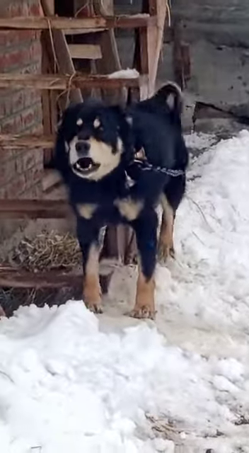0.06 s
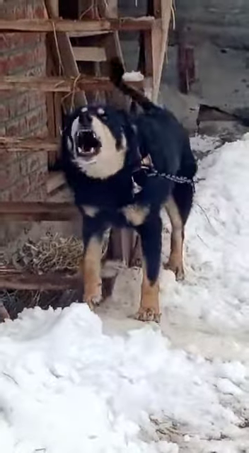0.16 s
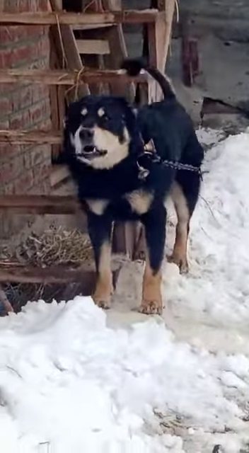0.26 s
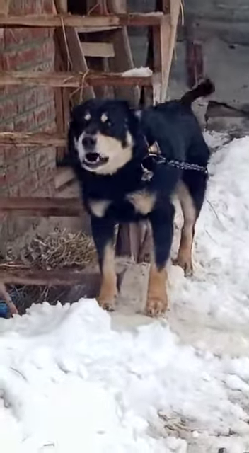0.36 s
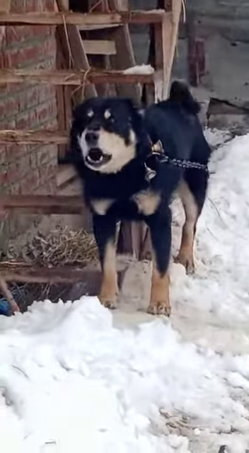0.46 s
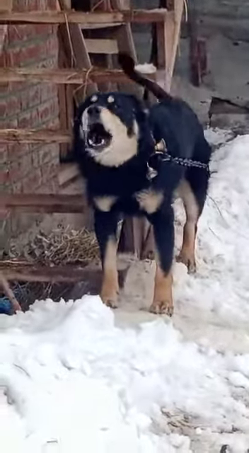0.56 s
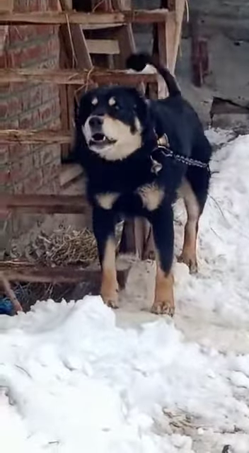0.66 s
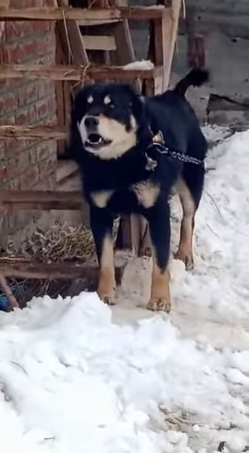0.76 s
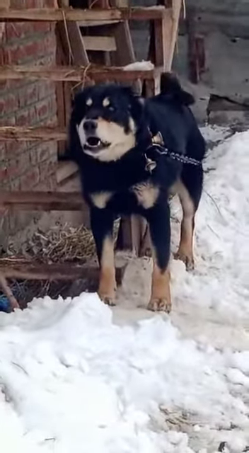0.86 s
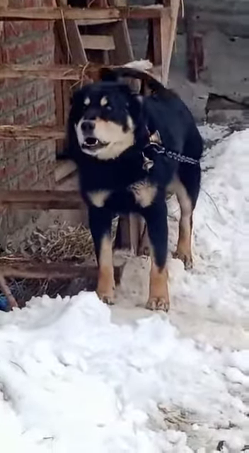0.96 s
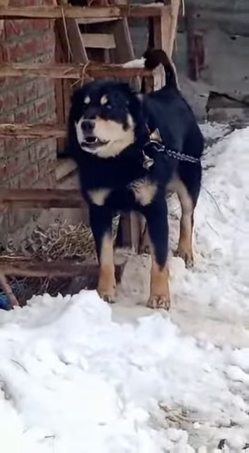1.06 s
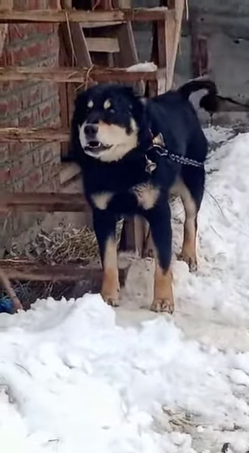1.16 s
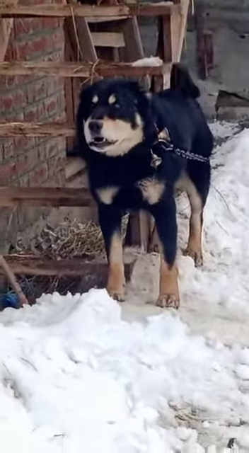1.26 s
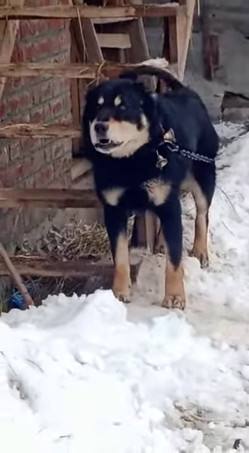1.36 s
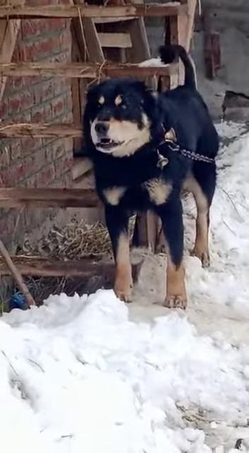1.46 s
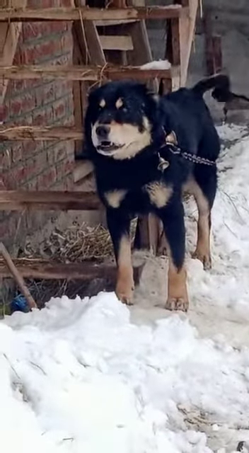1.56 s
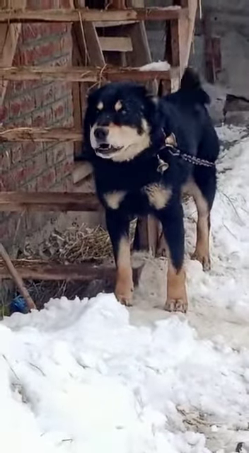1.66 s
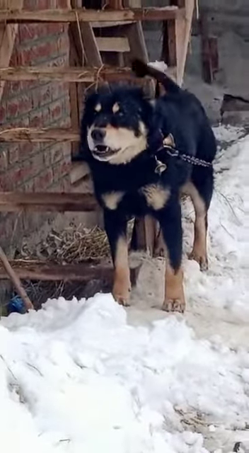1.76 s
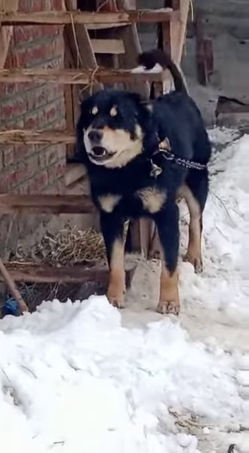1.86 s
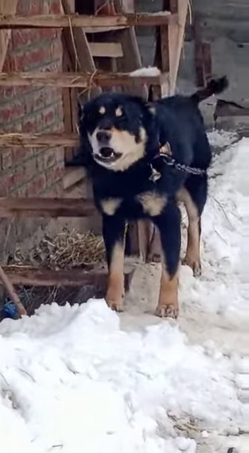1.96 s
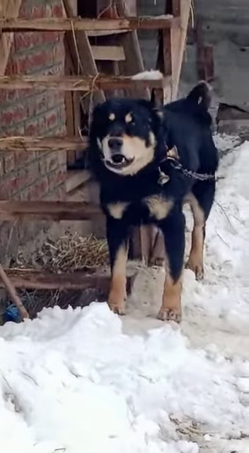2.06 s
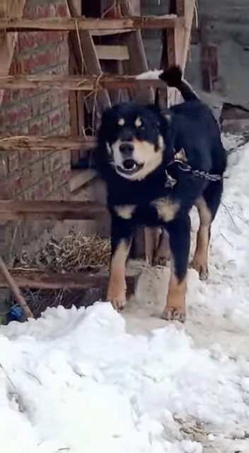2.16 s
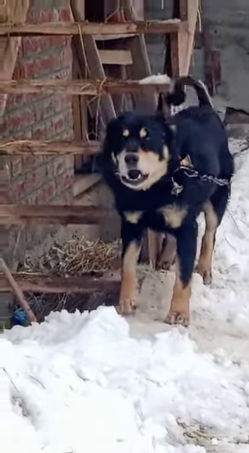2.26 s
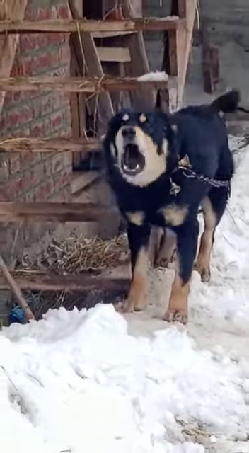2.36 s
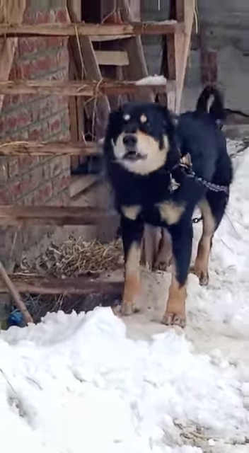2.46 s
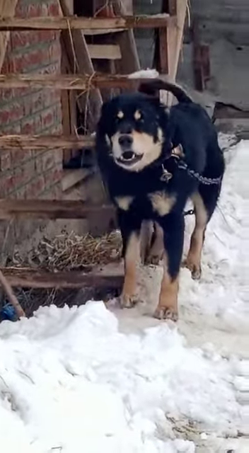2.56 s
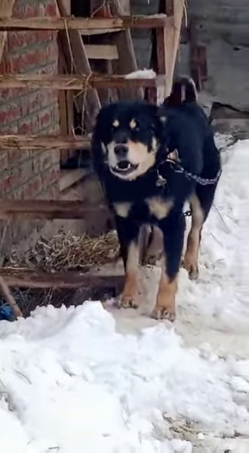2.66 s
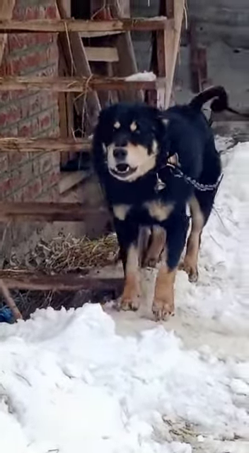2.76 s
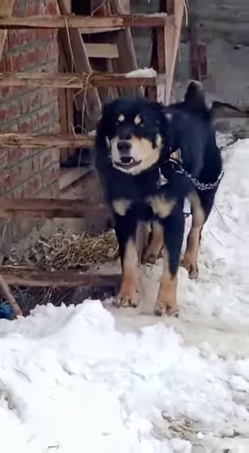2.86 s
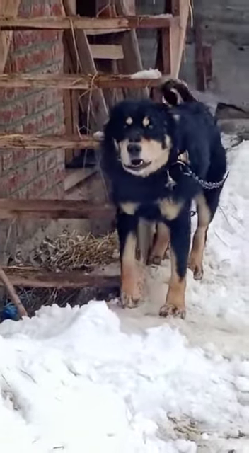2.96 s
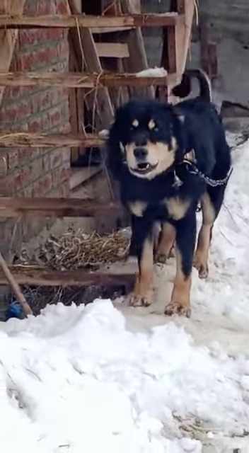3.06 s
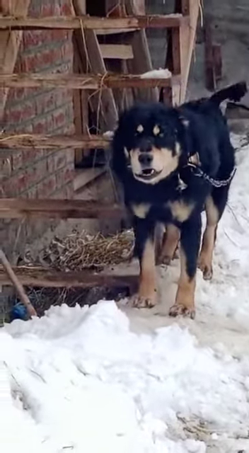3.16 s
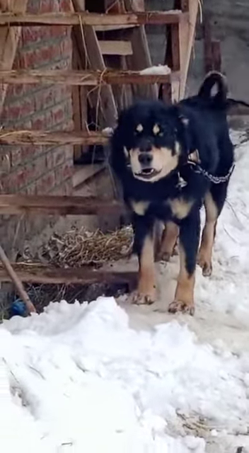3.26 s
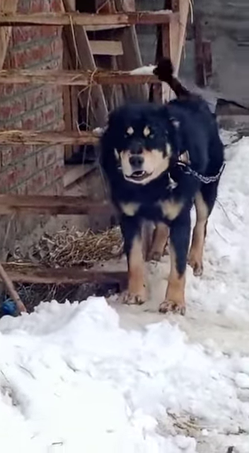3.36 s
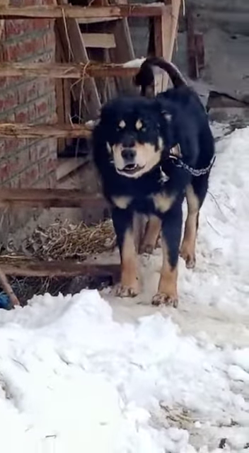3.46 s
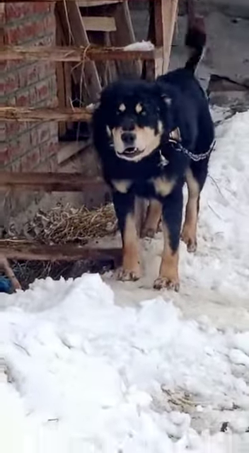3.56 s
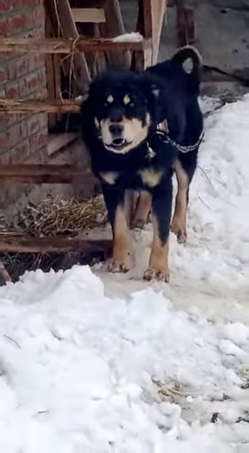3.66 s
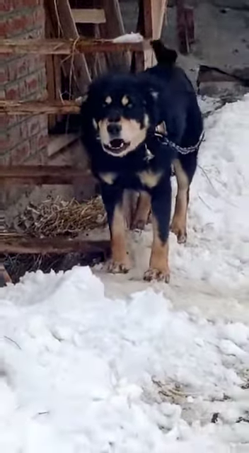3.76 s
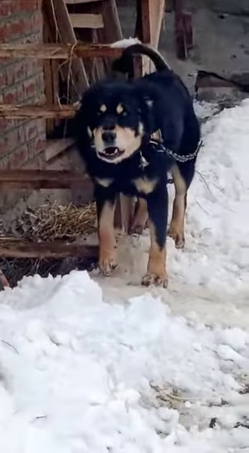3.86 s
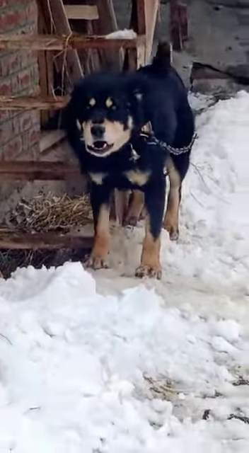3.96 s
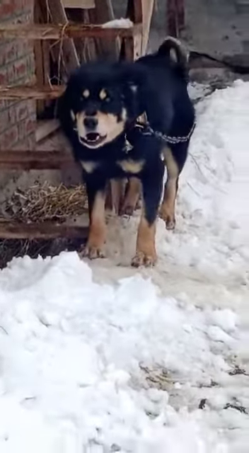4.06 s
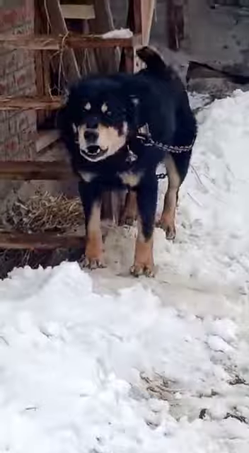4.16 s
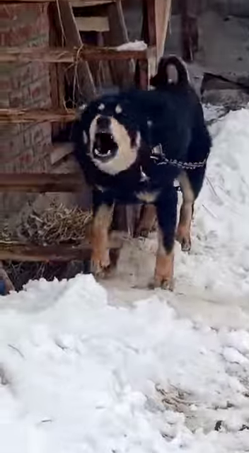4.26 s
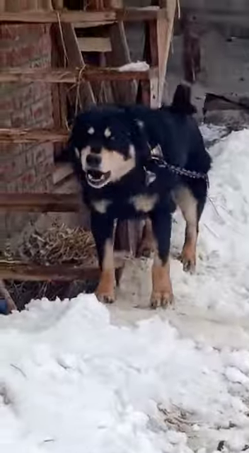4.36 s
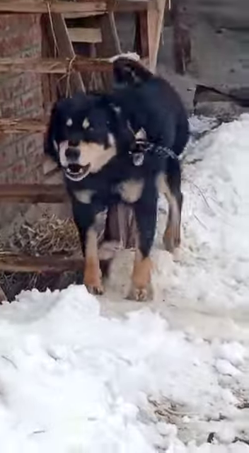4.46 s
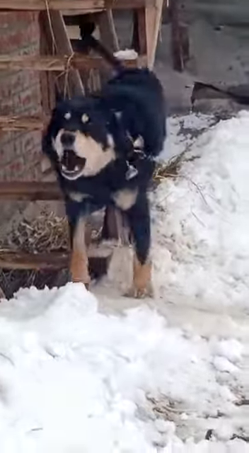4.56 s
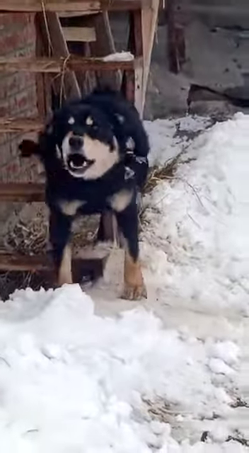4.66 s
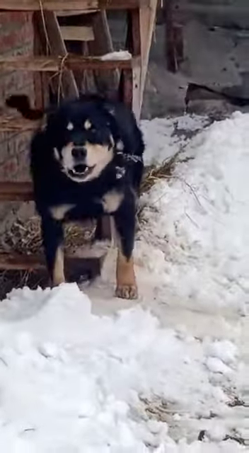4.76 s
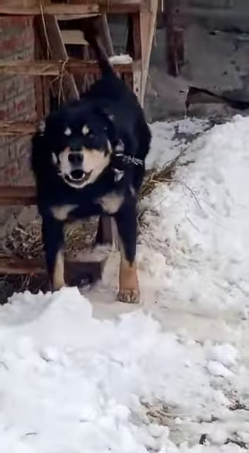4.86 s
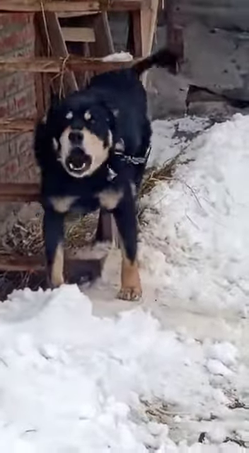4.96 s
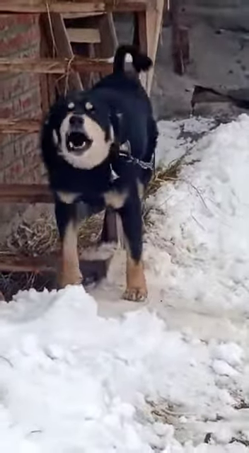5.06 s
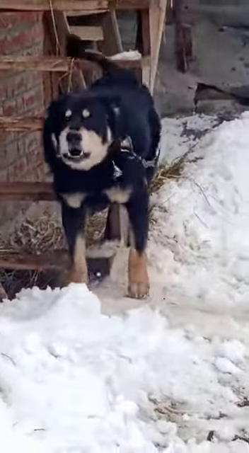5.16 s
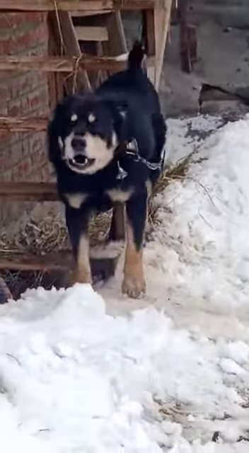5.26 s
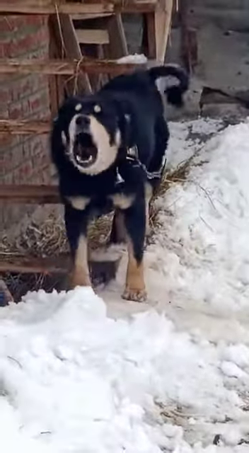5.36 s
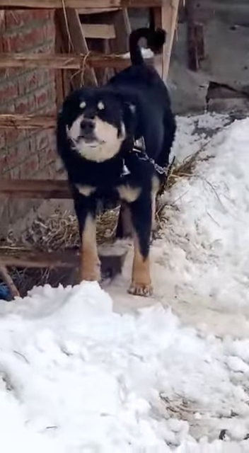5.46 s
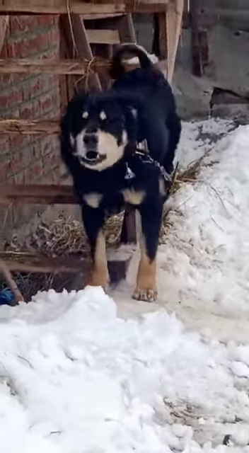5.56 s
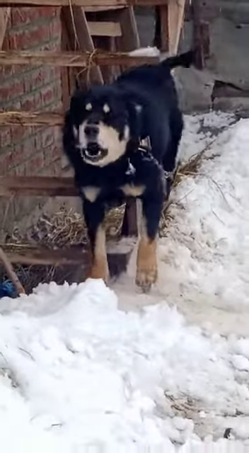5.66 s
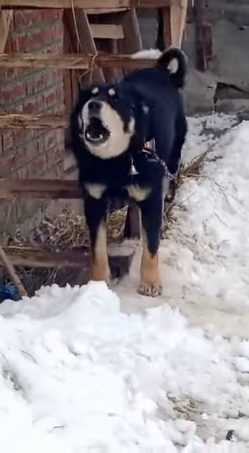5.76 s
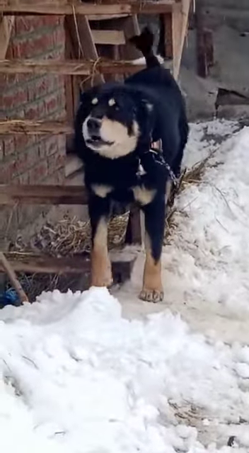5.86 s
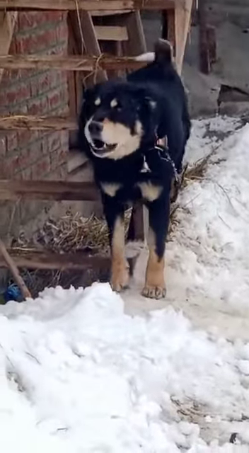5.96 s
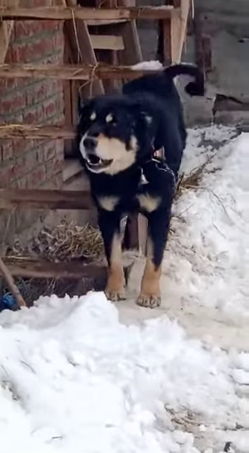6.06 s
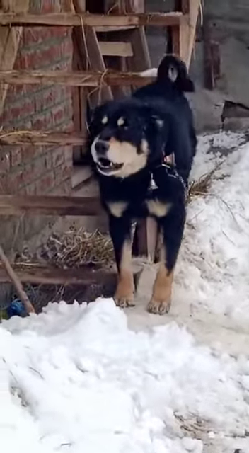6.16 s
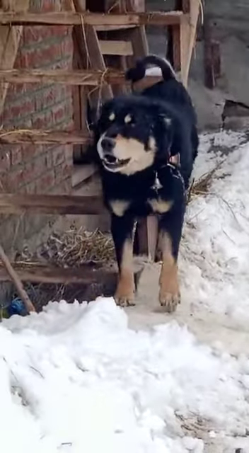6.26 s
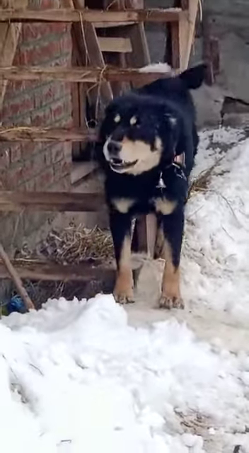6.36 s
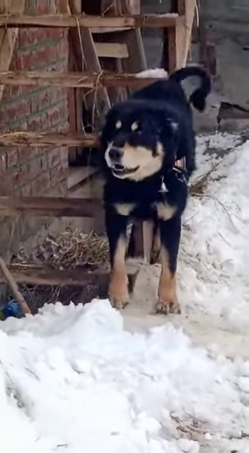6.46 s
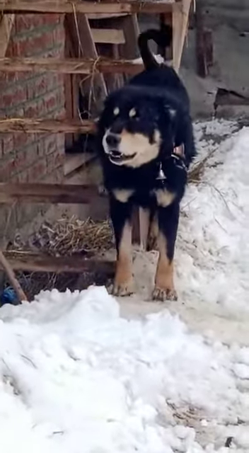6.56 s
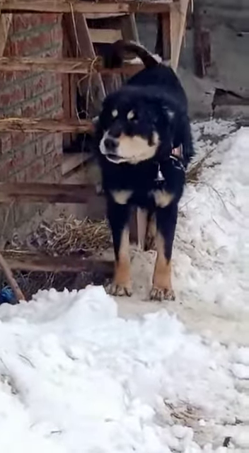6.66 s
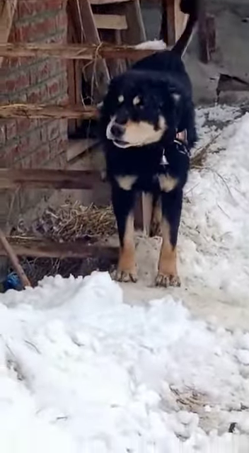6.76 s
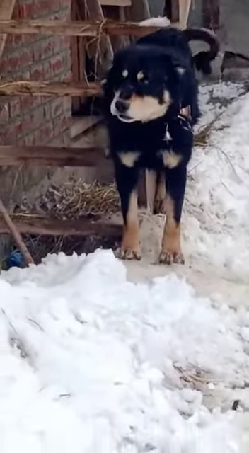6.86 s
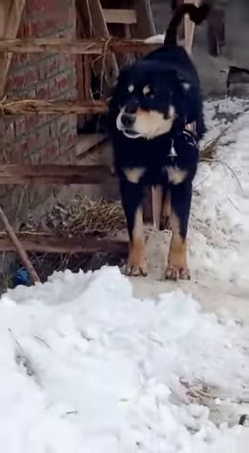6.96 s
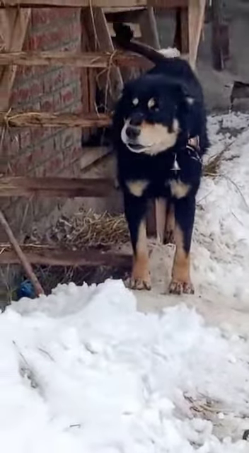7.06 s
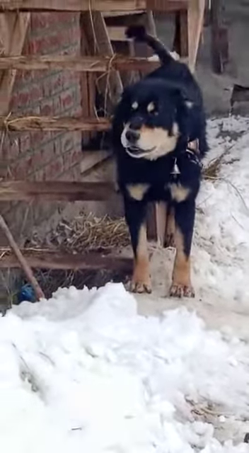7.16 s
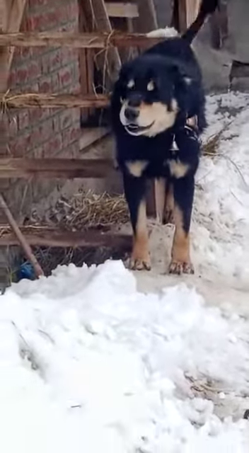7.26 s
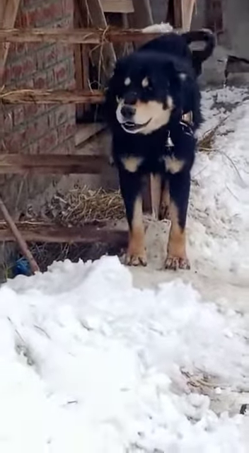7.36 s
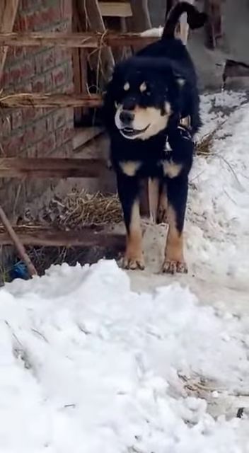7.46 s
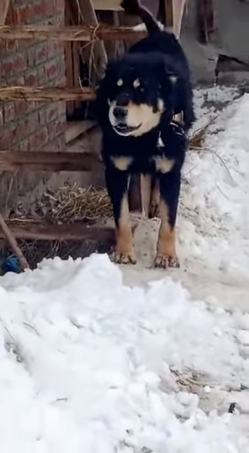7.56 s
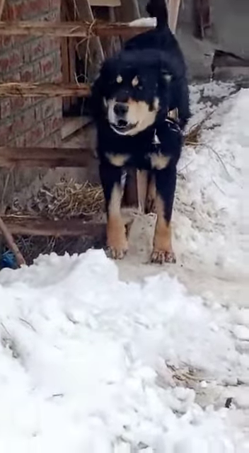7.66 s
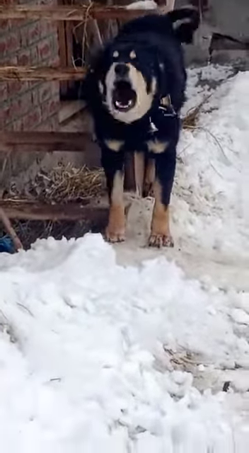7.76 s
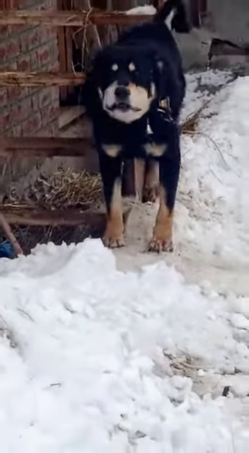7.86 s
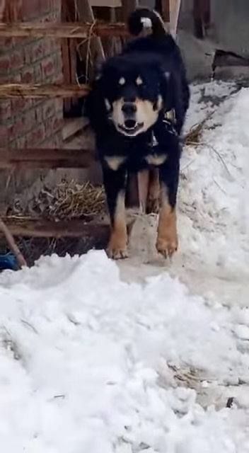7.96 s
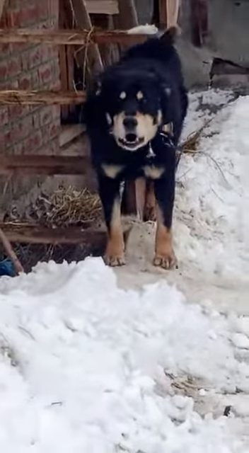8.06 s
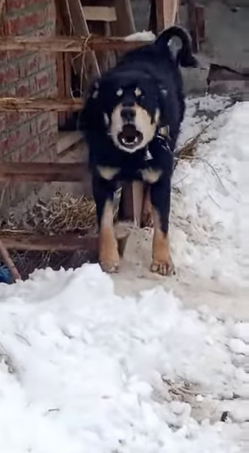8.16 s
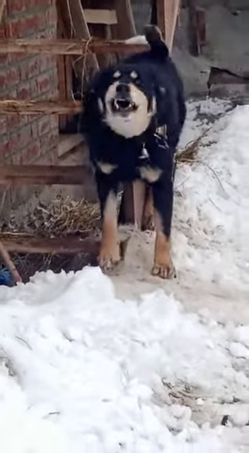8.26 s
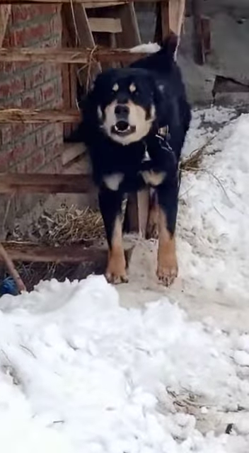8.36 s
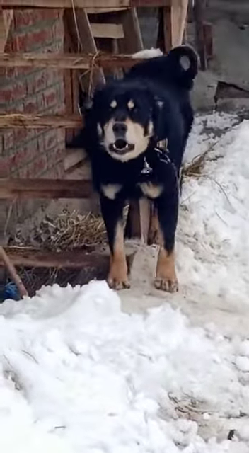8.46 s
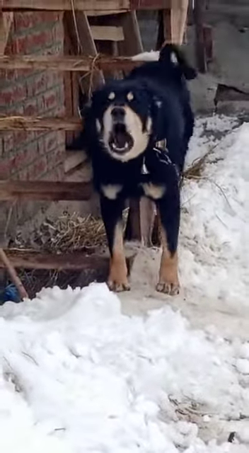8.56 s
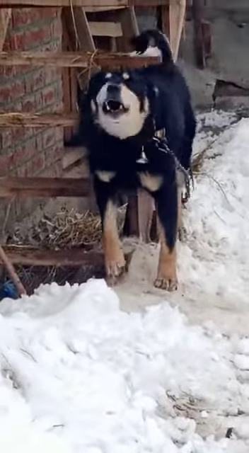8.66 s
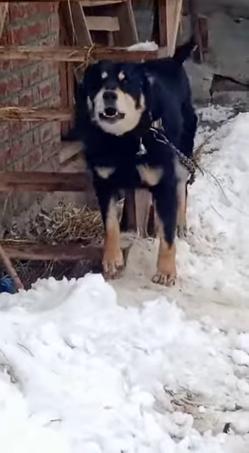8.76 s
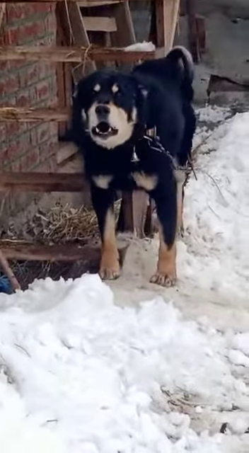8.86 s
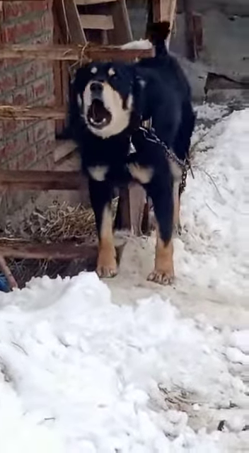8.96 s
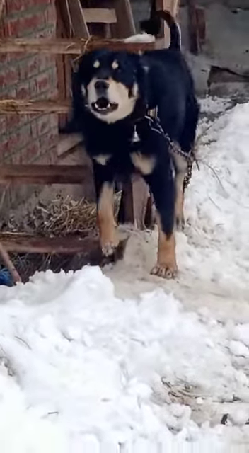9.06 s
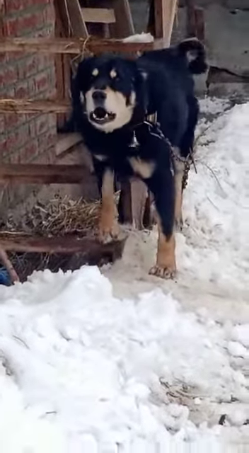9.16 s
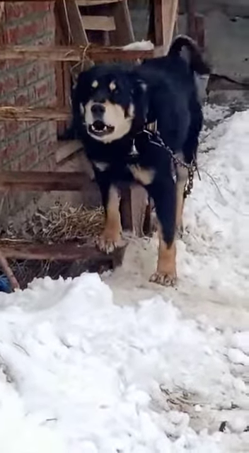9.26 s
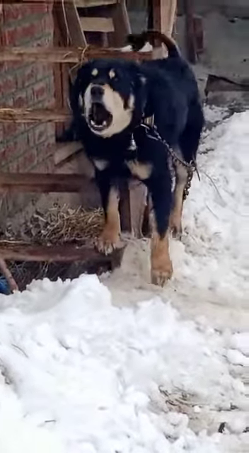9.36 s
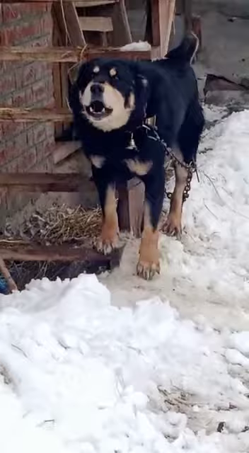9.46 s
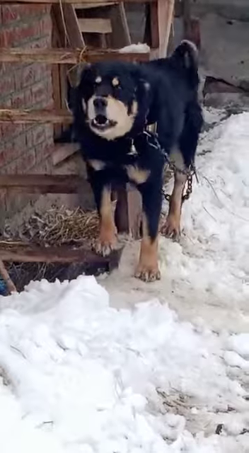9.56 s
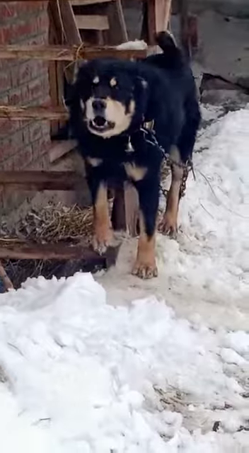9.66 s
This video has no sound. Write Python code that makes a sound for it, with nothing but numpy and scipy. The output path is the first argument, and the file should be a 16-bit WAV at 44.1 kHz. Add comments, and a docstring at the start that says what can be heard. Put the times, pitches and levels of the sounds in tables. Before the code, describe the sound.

A big dog barks in quick runs of sharp, rough barks, with short pauses filled by gasping breaths and faint low growls. A second dog answers with softer, hooting woofs near the start and again past the middle. A small collar bell tinkles, a chain ring clinks and paws thud faintly in snow. The main dog sounds close, in a quiet yard with a short echo.

```python
"""A snowy yard, where a big chained dog barks in fast runs, gasping and growling in between.
Each bark is a rough arch of pitch through throat and open mouth; in some a second, purer tone breaks in.
The collar bell tinkles, the chain's steel ring knocks and paws crunch dully in the snow.
A second dog answers with softer hooting woofs, and the walls throw back a short echo."""
import sys
import numpy as np
from scipy import signal
from scipy.fft import rfft, irfft, next_fast_len
from scipy.io import wavfile
from scipy.ndimage import uniform_filter1d, map_coordinates

SR = 44100
rng = np.random.default_rng(int(sys.argv[2]) if len(sys.argv) > 2 else 0)


def output_pcm(signal):
    """Save a mono or channel-first signal as 16-bit PCM at the path in sys.argv[1].

    Samples are clipped to [-1, 1] before scaling.
    """
    pcm = np.clip(np.atleast_2d(signal).T, -1, 1) * 32767
    wavfile.write(sys.argv[1], SR, np.round(pcm).astype(np.int16))


N = 428651
T = np.arange(N) / SR


def from_db(db):
    return 10 ** (np.asarray(db) / 20)


def rms_one(x):
    return x / np.sqrt(np.mean(x ** 2) + 1e-20)


def evened(x):
    """Holds the running level at 1, over a 10 ms window."""
    return x / np.sqrt(np.abs(uniform_filter1d(x * x, 441)) + 1e-12)


def drift(n, rate):
    """A random wobble of spread about 1 that turns rate times a second."""
    return np.interp(np.arange(n) / SR * rate, np.arange(n), rng.standard_normal(n))


def coloured(x, spectrum):
    """Equalises x along a curve of (Hz, dB) points."""
    hz, db = np.transpose(spectrum)
    size = next_fast_len(len(x))
    bins_hz = np.maximum(np.fft.rfftfreq(size, 1 / SR), 1)
    curve_db = np.interp(np.log(bins_hz), np.log(hz), db, left=-90, right=-90)
    return irfft(rfft(x, size) * from_db(curve_db), size)[:len(x)]


def cut(x, hz, kind, order=2):
    return signal.sosfilt(signal.butter(order, hz, kind, fs=SR, output="sos"), x)


def resonate(x, modes):
    """Parallel resonances with alternating signs."""
    out = 0
    for k, (hz, width, db) in enumerate(modes):
        r = np.exp(-np.pi * width / SR)
        ringing = signal.lfilter([1, 0, -1], [1, -2 * r * np.cos(2 * np.pi * hz / SR), r * r], x)
        out = out + (-1) ** k * from_db(db) * (1 - r * r) / 2 * ringing
    return out


def span(start, length, attack, release):
    """The samples an event covers, and its gate with soft edges; all times in seconds."""
    at = np.flatnonzero((T >= start) & (T < start + length))
    edge = np.minimum((T[at] - start) / attack, (start + length - T[at]) / release)
    return at, np.sin(np.pi / 2 * np.clip(edge, 0, 1))


def clicks(hits, gains=1):
    """One impulse for each (seconds, dB) hit."""
    out = np.zeros(N)
    seconds, db = np.transpose(hits)
    out[(seconds * SR).astype(int)] = from_db(db) * gains
    return out


# The tone of the open air. Each row: frequency in Hz, relative level in dB.
AIR_COLOUR = [(25, -14.5), (90, 3), (250, -5), (600, -2), (900, -6), (1300, -4), (2000, -6.5),
              (3200, -18.5), (5800, -13), (8000, -27), (16000, -31.5)]


def outdoor_air():
    """A faint, dark bed of noise under the whole scene."""
    return from_db(-76) * rms_one(coloured(rng.standard_normal(N), AIR_COLOUR))


# Narrow, fixed resonances that colour the treble of breath and rasp. Each row: centre in Hz, width in Hz, gain
# in dB.
FINE_PEAKS = [(3328, 27, 0.5), (4082, 270, 2.5), (4145.8, 133, 2.5), (4334, 130, -1.5), (5250, 190, 0.5),
              (5640, 200, 5), (6321, 580, -5), (6910, 160, 3), (8840, 980, -0.5), (11360, 430, 0.5)]


def with_fine_peaks(rush):
    """Sharp, fixed peaks rise out of a broad rush of air."""
    return resonate(rush, FINE_PEAKS) + from_db(-13) * rush


# The wide-open throat. Each row: centre in Hz, width in Hz, gain in dB.
OPEN_THROAT = [(600, 33, 1), (1242.3, 57, 8), (1735, 210, 2), (2258, 140, 3.5)]
# The tone of a gasp. Each row: frequency in Hz, gain in dB.
GASP_COLOUR = [(260, -39), (450, -2.5), (538, -5.5), (930, -1), (1270, -4), (2190, -8.5), (2510, -6.5),
               (3320, -14), (4740, -22), (6190, -19), (7610, -32.5), (7960, -43.5), (10100, -40),
               (13000, -34.5), (15500, -17)]
# Breaths. Each row: start in seconds, length in seconds, relative level in dB, hiss boost in dB.
GASPS = [(-.08, 0.19, -53.5, 8.5), (0.321, 0.197, -53.5, 2.5), (0.694, 0.205, -56.5, 1),
         (0.91, 0.6, -60.5, 7.5), (1.362, 0.33, -61, -1), (1.753, 0.25, -59.5, -1), (2.098, 0.23, -57.5, 1),
         (2.537, 0.2575, -58, 0), (2.832, 0.23, -50, 0), (3.124, 0.186, -65.5, -4), (3.437, 0.61, -58.5, 2),
         (3.97, 0.264, -59, 5.5), (4.405, 0.203, -52, -1), (4.796, 0.36, -57.5, 16.5),
         (5.191, 0.18, -49, -1), (5.505, 0.22, -52, 0), (5.97, 0.24, -53.5, 2.5), (6.724, 0.22, -66, 1.5),
         (7.14, 0.42, -62.5, -11.5), (7.58, 0.14, -60.5, -6), (7.91, 0.26, -56, 2),
         (8.375, 0.2005, -53.5, 2), (8.748, .18, -54, 0.5), (9.146, 0.23, -52.5, -0.5),
         (9.572, .17, -53, 0)]


def gasps(growl_gain, puffs, hiss_above_hz=4200):
    """Air rushes through the dog's open mouth, dull or hissing, chopped into puffs while it growls."""
    chop_depth = np.clip(growl_gain / from_db(-68), 0, 1)
    rush = rng.standard_normal(N) * from_db(1.47 * drift(N, 90)) * (1 + chop_depth * (puffs - 1))
    breath = rms_one(coloured(with_fine_peaks(rush) + resonate(rush, OPEN_THROAT), GASP_COLOUR))
    body = cut(breath, hiss_above_hz, "low", order=3)
    hiss = cut(breath, hiss_above_hz, "high", order=3)
    out = np.zeros(N)
    for start, length, db, hiss_db in GASPS:
        at, gate = span(start, length, attack=.07, release=.12)
        out[at] += from_db(db) * gate * (body[at] + from_db(hiss_db) * hiss[at])
    return from_db(-5.5) * out


def swell(t, rise, fall, crest_db, edge_db, hold, bends):
    """A call's gain at time t from its crest; hold is the flat share, bends curve the rise and fall."""
    away = np.where(t < 0, -t / rise, t / fall)
    slope = np.maximum(away - hold, 0) / (1 - hold)
    flutter_db = 2.27 * drift(len(t), 110)   # unsteady lung pressure
    return from_db(crest_db + (edge_db - crest_db) * slope ** np.where(t < 0, *bends) + flutter_db)


def arch(t, rise, fall, top_hz, edge_hz, bends, hold=.2):
    """Pitch climbs with lung pressure, holds around the crest at t = 0 and drops again."""
    away = np.where(t < 0, -t / rise, t / fall)
    slope = np.clip((away - hold) / (1 - hold), 0, 1.2)
    dome_hz = top_hz * (1 - .0632 * away ** 2)
    return dome_hz * min(edge_hz / top_hz, .7) ** (slope ** np.where(t < 0, *bends))


def folds(hz, rough, jitter, harmonics=20):
    """Jittery vocal folds: low harmonics, high harmonics, air let through on each cycle, and phase."""
    n = len(hz)
    phase = 2 * np.pi * np.cumsum(hz * (1 + jitter * rough * drift(n, 342.2))) / SR
    shimmer = 1 + .5 * rough * drift(n, 300)
    low = sum(np.cos(k * phase) for k in range(1, 4))
    high = sum(np.cos(k * phase) for k in range(4, harmonics + 1))
    air = (1 + .38 * np.cos(phase)) * rng.standard_normal(n)
    return shimmer * low, shimmer * high, air, phase


def with_jaw(x, closed):
    """Resonances sink as the jaw closes."""
    speed = 1 - .03 * (closed - closed.mean())
    return map_coordinates(x, [np.cumsum(speed)], order=3, mode="mirror")


def throat_ring(t, hz, centre_hz=552.7, width_hz=51.05):
    """The climbing second harmonic locks onto the throat resonance for a moment and rings clean."""
    lock = np.exp(-((2 * hz - centre_hz) / width_hz) ** 2) * np.clip(-t / .01, 0, 1)
    return np.sqrt(2) * lock * np.sin(2 * np.pi * np.cumsum(2 * hz) / SR)


# The big dog's throat and mouth resonances. Each row: centre in Hz, width in Hz, gain in dB.
THROAT = [(400, 86, -8.5), (536.5, 46.9, 14)]
MOUTH = [(735, 67.4, 5.5), (1143, 119.6, -0.5), (1498, 174, -5.5), (2273, 226, -10.5), (2850, 340, -17.5)]
# Air tearing past tongue and teeth. Each row: frequency in Hz, gain in dB.
RASP_COLOUR = [(2900, -19.5), (3150, -3.5), (3400, -11), (3650, -5), (4200, -6), (4800, -5.5), (5500, -6),
               (6300, -2), (7400, -12), (7900, -21.5), (9200, -20), (11500, -18), (12700, -20),
               (15400, -1.5), (18500, -17.5)]
# The barks. Each row: start, attack, rise and fall in seconds, crest pitch in Hz, roughness from 0 to 1,
# levels of throat, ring, mouth and rasp in dB, gape as a factor on the mouth's resonances.
BARKS = [(.084, .008, 0.13, 0.051, 413.2, 0.06, -30, -32.5, -25.5, -39.5, 1.025),
         (.494, 0.01, 0.11, 0.0709, 399.4, 0.1, -33.5, -32, -27.5, -41, 0.99),
         (1.895, 0.0403, 0.057, .085, 254.7, 0.6, -39.5, -30, -39.5, -52, 0.91),
         (2.328, 0.017, 0.11, 0.073, 391.4, 0.15, -34.5, -29, -26.5, -42, 0.935),
         (3.73, 0.072, .117, 0.058, 200, 0.95, -40, -63.5, -47, -57, 1),
         (4.218, 0.0177, 0.099, 0.067, 406, 0.18, -30, -33.5, -27, -41.5, 0.99),
         (4.576, 0.018, 0.088, 0.088, 382, 0.68, -32, -41.5, -33, -38.5, 1.05),
         (4.984, 0.0091, 0.0932, 0.074, 391.6, .4, -32, -22, -30, -40, .99),
         (5.348, .008, .088, 0.1, 375.7, 0.3, -27.5, -23, -30, -41.5, 1.05),
         (5.702, .008, .083, 0.1, 355.8, 0.73, -32, -22.5, -30.5, -41, 0.9),
         (7.721, 0.0086, .09, .076, 352.6, .55, -29, -35, -31, -42.5, 0.95),
         (8.172, 0.013, 0.11, 0.0615, 398, 0.22, -28.5, -27.5, -26.5, -41, 0.983),
         (8.568, 0.0066, 0.096, 0.077, 379.8, 0.33, -30.5, -23, -28, -40.5, 0.994),
         (8.921, 0.011, .099, 0.067, 364.5, .25, -34, -21.5, -27.5, -44, 0.97),
         (9.351, 0.02, 0.11, 0.06, 388, 0.18, -33, -28, -27, -42, 0.99)]


def barks(jaw_lag_s=.0027):
    """The voice rings in the throat, opens out through the mouth and carries a bright rasp."""
    out, takeover = second_tone()
    for start, attack, rise, fall, top_hz, rough, throat_db, ring_db, mouth_db, rasp_db, gape in BARKS:
        at, gate = span(start, rise + fall, attack, release=.022)
        t = T[at] - start - rise
        throat_gain = swell(t, rise, fall, throat_db, edge_db=-57, hold=.3, bends=(2, 1))
        throat_gain *= from_db(-3 * takeover[at])   # ducks under the second tone
        mouth_gain = swell(t - jaw_lag_s, rise, fall, mouth_db, edge_db=-55.5, hold=.2047, bends=(1.5, 1))
        rasp_gain = swell(t, rise, fall, rasp_db, edge_db=-64, hold=.16, bends=(2.5, 1.5))

        hz = arch(t, rise, fall, top_hz, edge_hz=205, bends=(1.25, 1.068))
        slack = np.tanh(5 * (1 - hz / top_hz))   # away from the crest the folds flap chaotically
        rough = rough + .51 * slack * (1 - rough)
        low, high, air, phase = folds(hz, rough, jitter=.06)

        throat = resonate(low + 11 * rough * air, THROAT)
        throat = evened(cut(cut(throat, 680, "low", order=4), 320, "high", order=4))
        ring = from_db(ring_db) * throat_ring(t, hz)
        open_mouth = [(centre * gape, width, db) for centre, width, db in MOUTH]
        mouth = resonate(low + from_db(-9.5) * high + 11.3 * rough * air, open_mouth)
        mouth = evened(cut(cut(mouth, 690, "high", order=6), 3300, "low", order=6))

        # slack folds alternate strong and weak beats, and the chest sounds the octave below
        chest = np.sin(phase) + from_db(-12.5) * np.sin(phase / 2)
        chest *= slack * from_db(-32.5) * throat_gain ** .45
        hiss = (air + from_db(-11) * high) * (1 + .35 * np.sin(phase / 2))
        hiss *= from_db(2 * drift(len(at), 120))
        rasp = coloured(with_fine_peaks(hiss), RASP_COLOUR)
        rasp = rms_one(with_jaw(rasp, closed=np.clip(t / fall, 0, 1)))
        teeth = from_db(rasp_db - 6) * teeth_hiss(hiss, t / fall)
        out[at] += gate * (throat_gain * throat + ring + mouth_gain * mouth + rasp_gain * rasp
                           + teeth + chest)
    return out


# Resonances of the gaps between the teeth. Each row: centre in Hz, width in Hz, gain in dB.
TEETH = [(2180, 200, -1.5), (2800, 170, -3.5), (2850, 130, -2), (4850, 350, -6.5)]


def teeth_hiss(hiss, share_of_fall):
    """As the jaw shuts, midway down the bark's fall, air squeezes between the teeth."""
    shutting = np.exp(-((share_of_fall - .54) / .28) ** 2)
    return shutting * rms_one(cut(resonate(hiss, TEETH), [1800, 5500], "band"))


# First reflections off ground and walls. Each row: delay in seconds, gain in dB.
BOUNCES = [(.0031, -22), (.0087, -23.5), (.0143, -17.5), (.058, -34.5), (.081, -29), (.115, -32.5)]


def bounces(x):
    """Hard surfaces nearby slap back dulled copies."""
    dull = cut(x, 3500, "low", order=1)
    return sum(from_db(db) * np.interp(T - delay, T, dull, left=0) for delay, db in BOUNCES)


# The yard's reverb. Each row: band centre in Hz, gain in dB, seconds to fade by 60 dB.
YARD_BANDS = [(173, -28.5, 0.1), (466, -26, 0.37), (870, -27.5, 0.46), (2095, -14, 0.13),
              (3630, -21.5, 0.17), (7200, -21.5, 0.47), (14000, -29.5, .2)]


def yard_echo(x, build_s=.012):
    """Walls and sheds scatter the sound into a short tail."""
    t, response = T[:SR], 0
    for hz, db, t60 in YARD_BANDS:
        band = cut(rng.standard_normal(SR), [hz / np.sqrt(2), min(hz * np.sqrt(2), SR * .45)], "band")
        tail = band * from_db(-60 * t / t60) * (1 - np.exp(-(t / build_s) ** 2))
        response = response + from_db(db) * tail / np.sqrt(np.sum(tail ** 2))
    return signal.fftconvolve(x, response)[:N]


def jingle(hits, modes):
    """Each metal strike has a softened onset, a weaker hit just before it; modes vary in strength."""
    out = 0
    for hz, db, t60 in modes:
        r, w = from_db(-60 / (t60 * SR)), 2 * np.pi * hz / SR
        strengths = rng.choice([-1, 1], len(hits)) * from_db(db + 2 * rng.standard_normal(len(hits)))
        strikes = clicks(hits, strengths)
        soft_onset = .47 * np.roll(strikes, -int(rng.uniform(.0011, .0087) * SR))
        out += signal.lfilter([0, np.sin(w)], [1, -2 * r * np.cos(w), r * r], strikes + soft_onset + 1e-18)
    return out


# The bell's partials. Each row: frequency in Hz, relative level in dB, seconds to fade by 60 dB.
BELL_MODES = [(7458, -7.5, .33), (7518, -10.5, 0.35), (9260, -16.5, .17), (9190, -14.5, .18),
              (10200, -16, .22), (10415, -11.5, 0.3), (14450, -8, .15), (15590, -3.5, .11)]
# Shakes of the bell. Each row: start in seconds, relative level in dB.
TINKLES = [(.369, -77.5), (4.481, -46), (4.519, -48.5), (4.581, -52.5), (4.845, -51), (4.965, -59),
           (5.278, -56.5), (5.695, -55), (5.989, -61.5), (6.449, -63.5), (6.465, -47), (7.923, -60),
           (7.948, -58.5), (8.095, -57.5), (8.508, -53), (8.847, -60), (9.541, -58.5)]


def collar_bell():
    """A small bell tinkles on the collar, and each bark jolts it on the way down."""
    jolts = [(start + rise + .35 * fall, rasp_db - 19) for start, _, rise, fall, *_, rasp_db, _ in BARKS]
    return from_db(-3) * jingle(TINKLES + jolts, BELL_MODES)


# The steel ring's partials. Each row: frequency in Hz, relative level in dB, seconds to fade by 60 dB.
STEEL_MODES = [(2702, -8.5, 1.1), (4800, -12, 0.46), (5780, -5, 0.69), (8640, -15, .33),
               (12850, -12.5, .16)]
# Knocks of the ring. Each row: start in seconds, relative level in dB.
KNOCKS = [(.37, -58), (1.035, -60), (1.509, -52), (5.19, -64.5), (6.13, -57.5), (6.485, -58), (6.845, -60),
          (8.162, -60)]


def chain_ring():
    """The chain's steel ring knocks on the collar and rings on."""
    return from_db(-3.5) * jingle(KNOCKS, STEEL_MODES)


# The growls. Each row: start, length and attack in seconds, relative level in dB,
# pulses per second at the start and at the end.
GROWLS = [(.44, .3, .04, -76, 95, 85), (0.938, .74, .04, -70, 80, 92), (2.446, .37, .04, -79.5, 87, 89),
          (2.804, .16, 0.031, -66.5, 100, 90), (3.319, .4, .12, -65, 72, 110),
          (3.679, .27, 0.035, -65.5, 122, 115), (4.557, .35, 0.089, -71.5, 80, 85),
          (4.993, .3, .04, -76, 78, 80), (6.871, .42, .05, -80, 92, 94), (8.749, .2, .06, -75, 96, 97)]
# The chest's resonances. Each row: centre in Hz, width in Hz, gain in dB.
CHEST = [(88, 12, -0.5), (180, 160, -8.5), (238, 26, -3.5), (595, 28, -4.5)]


def growls():
    """Slow pulses thud in the chest and rattle in the throat; returns sound, gain and puffs of air."""
    gain, rate = np.zeros(N), np.zeros(N)
    for start, length, attack, db, from_rate, to_rate in GROWLS:
        at, gate = span(start, length, attack, release=.054)
        gain[at] += from_db(db) * gate
        rate[at] = np.linspace(from_rate, to_rate, len(at))
    rate[rate == 0] = rate[rate > 0].mean()
    cycles = np.cumsum(rate * (1 + .017 * drift(N, 40))) / SR
    puffs = rms_one(np.exp(-3.2 * (cycles % 1)) * from_db(1.7 * drift(N, 80)))
    pulses = np.diff(np.floor(cycles), prepend=0) * from_db(2.6 * drift(N, 72))
    thud = rms_one(cut(resonate(pulses, CHEST), 780, "low"))
    rattle = rms_one(resonate(puffs * rng.standard_normal(N), OPEN_THROAT))
    return gain * (from_db(5) * thud + from_db(-5) * cut(rattle, 2100, "low")), gain, puffs


# The second dog's mouth resonances. Each row: centre in Hz, width in Hz, gain in dB.
WOOF_MOUTH = [(706, 60, -2.5), (923, 120, 0.5), (1230, 110, -0.5), (1489, 50, 2), (2020, 200, -8.5),
              (2480, 130, -6.5), (2830, 140, -7.5)]
# Its answers. Each row: start, rise and fall in seconds, crest pitch in Hz, roughness from 0 to 1,
# levels of throat and mouth in dB.
WOOFS = [(.75, 0.11, 0.092, 482.4, 0.01, -34, -50.5), (1.202, 0.097, 0.081, 494, .11, -30.5, -47),
         (1.592, 0.094, 0.098, 502.7, 0.04, -30.5, -47.5), (4.866, 0.12, 0.048, 444, 0.19, -38.5, -51),
         (5.779, .106, 0.084, 508.7, 0.09, -29.5, -42), (6.153, 0.099, .085, 503, 0.16, -29.5, -42.5),
         (6.524, .09, 0.092, 488, .05, -31, -49.5)]


def woofs():
    """With lips nearly closed the fundamental carries the call: a hoot with hoarse edges."""
    out = np.zeros(N)
    for start, rise, fall, top_hz, rough, throat_db, mouth_db in WOOFS:
        at, gate = span(start, rise + fall, attack=.016, release=.016)
        t = T[at] - start - rise
        throat_gain = swell(t, rise, fall, throat_db, edge_db=-64, hold=.2, bends=(1.25, 1.2))
        mouth_gain = swell(t, rise, fall, mouth_db, edge_db=-64, hold=.2, bends=(1.5, 2.2))

        hz = arch(t, rise, fall, top_hz, edge_hz=180, bends=(2.2, 2.3))
        slack = np.tanh(4 * (1 - hz / top_hz))
        hz = hz * (1 + .016 * drift(len(at), 60))   # the held note wavers
        rough = rough + .49 * slack
        low, high, air, phase = folds(hz, rough, jitter=.11, harmonics=6)

        hoarse = rms_one(cut(air, [400, 850], "band"))
        hoot = evened(np.sin(phase) + (.041 + .5 * slack) * hoarse)
        mouth = resonate(low + from_db(-7.5) * high + 7.9 * rough * air, WOOF_MOUTH)
        mouth = evened(cut(cut(mouth, 650, "high", order=4), 3000, "low", order=8))
        lips = from_db(-20) * rms_one(cut(cut(with_fine_peaks(air), 3200, "high"), 6500, "low", order=8))
        out[at] += gate * (throat_gain * hoot + mouth_gain * (mouth + lips))
    return out


# Footfalls. Each row: start in seconds, relative level in dB.
PAW_STEPS = [(2.83, -63.5), (5.065, -54), (5.175, -56), (5.288, -58), (5.608, -61), (6.083, -54),
             (6.749, -56), (7.014, -58.5), (7.155, -59.5), (7.359, -64), (7.558, -68.5)]


def paw_steps(t60=.22, band_hz=(115, 237)):
    """A paw sinks into packed snow with a dull crunch."""
    weight = signal.lfilter([1], [1, -from_db(-60 / (t60 * SR))], clicks(PAW_STEPS) + 1e-18)
    return from_db(-.5) * weight * rms_one(cut(rng.standard_normal(N), band_hz, "band"))


# Voice breaks within barks. Each row: start and length in seconds, first and last pitch in Hz,
# level in dB.
VOICE_BREAKS = [(4.293, 0.0451, 550, 506, -21.5), (4.643, 0.049, 563.6, 495.1, -26),
                (5.051, 0.073, 554.6, 503, -18), (5.412, 0.0594, 517, 546.7, -18.5),
                (5.762, 0.068, 532, 497.8, -15.5), (7.776, 0.0824, 540.3, 497, -16.5),
                (8.228, 0.077, 547.5, 524, -24), (8.643, 0.0415, 526.5, 525, -15.5)]


def second_tone():
    """A second oscillator in the larynx, nearly pure; also returns how far it has taken over (0-1)."""
    out, takeover = np.zeros(N), np.zeros(N)
    for start, length, from_hz, to_hz, db in VOICE_BREAKS:
        at, gate = span(start, length, attack=.028, release=.025)
        hz = np.linspace(from_hz, to_hz, len(at)) * (1 + .0092 * drift(len(at), 120))
        phase = 2 * np.pi * np.cumsum(hz) / SR
        tone = np.sin(phase) + from_db(-21.5) * np.sin(2 * phase)
        out[at] += np.sqrt(2) * from_db(db) * gate ** 2 * tone
        takeover[at] = gate
    return out, takeover


def scene():
    """A mono mix: both dogs' calls feed the echo, the second dog's more; the small sounds stay dry."""
    near_dog, far_dog = barks(), woofs()
    growling, growl_gain, puffs = growls()
    breath = gasps(growl_gain, puffs)
    collar = collar_bell() + chain_ring()
    air = outdoor_air()
    echo = bounces(near_dog) + yard_echo(from_db(-7) * near_dog + from_db(-2.5) * far_dog)
    return (near_dog + far_dog + echo + growling + breath + paw_steps() + collar + air)[None]


def record(dry):
    """Rolls off the deep bass and cuts the top steeply at 16 kHz."""
    top_cut = signal.ellip(12, .2, 80, 16000, fs=SR, output="sos")
    return signal.sosfilt(top_cut, cut(dry, 45, "high"))


dry = scene()
out = record(dry)
output_pcm(out)
```